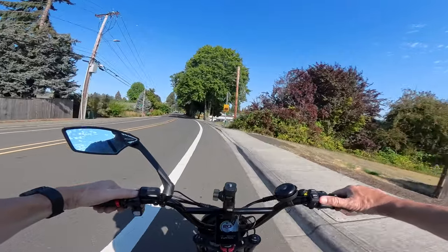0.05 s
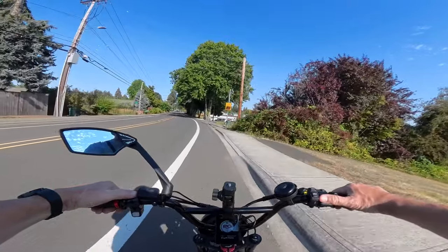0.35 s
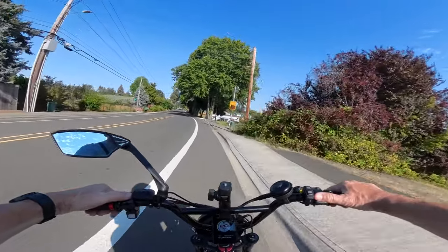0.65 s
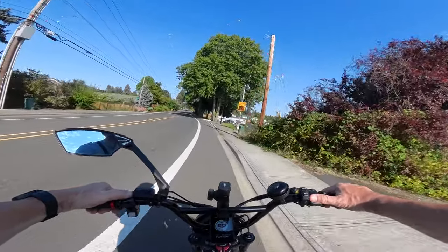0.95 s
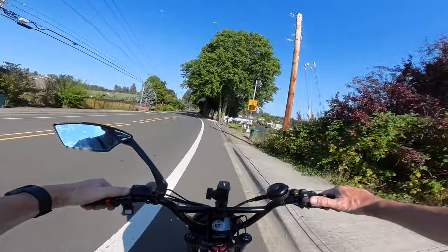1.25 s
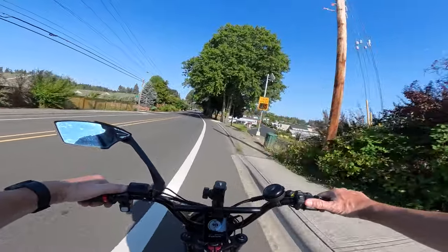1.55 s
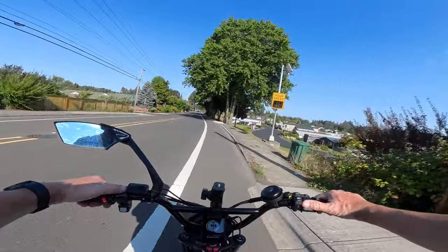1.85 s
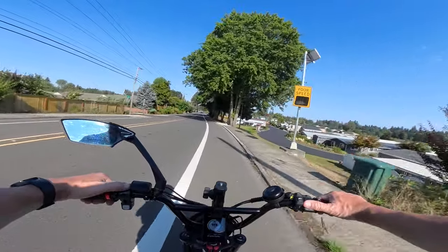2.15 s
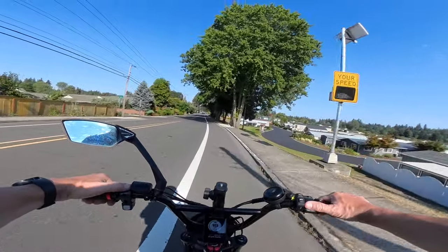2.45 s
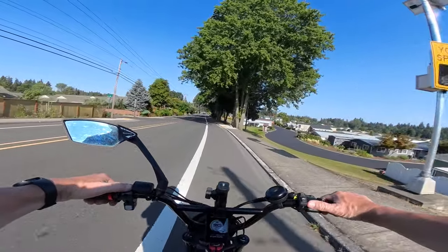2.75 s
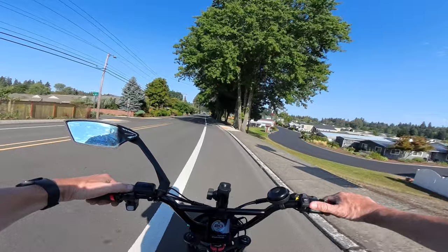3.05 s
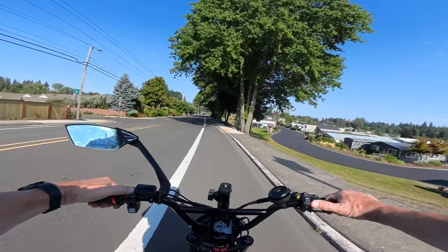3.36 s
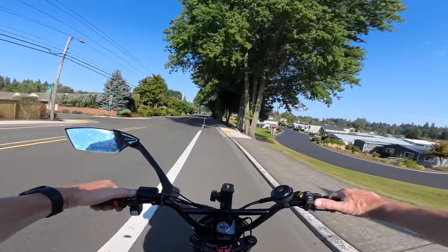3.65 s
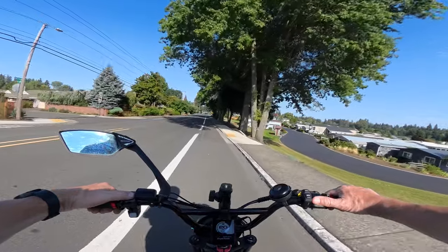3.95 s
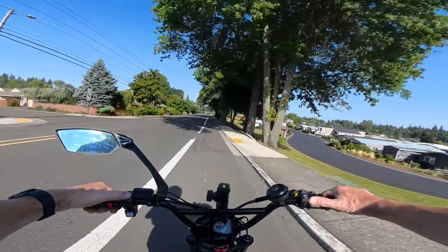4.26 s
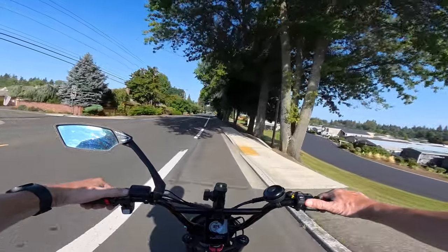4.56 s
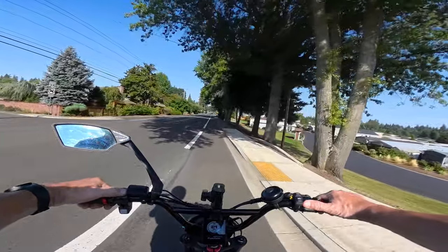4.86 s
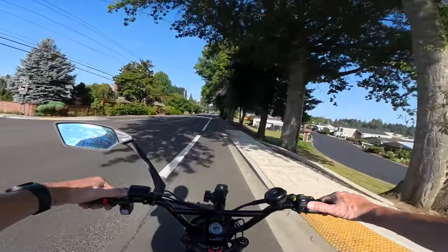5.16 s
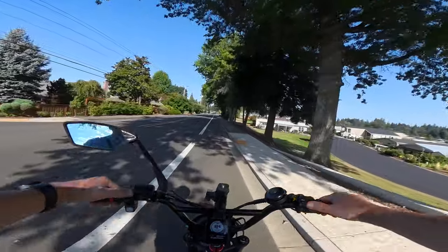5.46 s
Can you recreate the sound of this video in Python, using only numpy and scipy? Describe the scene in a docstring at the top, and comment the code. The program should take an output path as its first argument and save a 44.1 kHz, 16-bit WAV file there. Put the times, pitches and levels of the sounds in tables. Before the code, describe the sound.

Wind rumbles and thumps over the hum of an electric bike's motor, its tyres singing on asphalt with a faint brake rub.

```python
"""On a street, an electric bicycle coasts, then gathers speed, heard from the rider's chest.
The hub motor hums with the throttle, and its harmonics swell as they climb through frame resonances.
The tyres sing on the asphalt, and a slotted brake disc brushes its pads on every turn.
Turbulent air rumbles, gusts and buffets at the microphone.
Near the end the motor fades back and worn asphalt crunches and ticks."""
import sys
import numpy as np
from scipy import signal
from scipy.fft import rfft, irfft
from scipy.io import wavfile
from scipy.ndimage import uniform_filter1d

SR = 44100
rng = np.random.default_rng(int(sys.argv[2]) if len(sys.argv) > 2 else 0)


def digitize_waveform(pressure):
    """Quantize a signal to 16-bit integers and store it at the path in sys.argv[1].

    Rows of a 2-D input are taken as channels; values are limited to [-1, 1].
    """
    field = np.atleast_2d(pressure).T
    bounded = np.clip(field, -1, 1)
    quanta = np.round(bounded * 32767).astype(np.int16)
    wavfile.write(sys.argv[1], SR, quanta)


N = 251370
TIME = np.arange(N) / SR
FREQ = np.arange(N // 2 + 1) * SR / N

# Motor pitch, proportional to road speed. Each row: time in seconds, fundamental in Hz.
HUM_PITCH = [(0, 245.3), (1.6, 239), (2.1, 244.6), (3.5, 254.4), (4.5, 262.7), (5, 266.3), (5.7, 267.5)]
# Throttle. Each row: time in seconds, level of the fundamental in dB.
HUM_LEVEL = [(0, -45.5), (.5, -47), (.9, -56), (1.6, -50.5), (1.9, -54), (2.03, -41.5), (2.7, -41.3),
             (3.25, -38), (4.05, -43), (4.92, -40.3), (5.17, -50), (5.7, -50)]
# Motor harmonics. Each row: multiple of the fundamental, relative level in dB, flutter in dB.
HUM_HARMONICS = [(1, 0, 1.3), (2, -8.3, .4), (3, -2.6, 1.8), (4, -13, 1.5), (5, -12, 1.5)]
# Frame resonances. Each row: frequency in Hz, width in Hz, boost in dB.
FRAME_MODES = [(498, 3.5, 11), (505.5, 8, 10.5), (514, 9, 19.3), (521, 3.5, 15), (735, 7, 4.5),
               (743, 5, 2.5), (753, 8, 4), (766, 9, 4), (785, 10, 9), (795, 8, 8.5)]
# Bands of the tread. Each row: frequency at mean speed in Hz, width in Hz, relative level in dB,
# exponent of speed (1 follows the speed, 0 stays on a tyre resonance).
TYRE_BANDS = [(258.1, 24, -7.5, 1), (413.9, 69, -5.5, 0.012), (517, 22, -2.5, 0.03), (545.8, 45, -1.5, .6),
              (791, 52, -6, .3), (812.7, 67, -0.5, 0.0048), (1011, 67, -11.5, 0.3), (1250, 48, -8.5, 0.4)]
# Brief tyre tones. Each row: centre in seconds, length in seconds, pitch in Hz, level in dB.
TYRE_DRONES = [(.38, .14, 820, -43), (1.55, .1, 517, -38), (1.84, .12, 565, -41), (1.88, .1, 790, -39),
               (2.25, .08, 515, -39), (2.75, .12, 518, -39), (4.58, .12, 538, -39), (5.26, .08, 515, -37),
               (5.4, .12, 786, -37.5), (5.62, .14, 829, -36.5), (5.62, .2, 268, -41), (5.68, .1, 535, -35)]
# Rolling effort. Each row: time in seconds, relative level in dB.
ROLLING_EFFORT = [(0, -2.5), (.8, -1), (1.3, -2.5), (2, -0.5), (3.2, 0.47), (4.2, 0.8), (4.8, 0.6),
                  (5.4, 1.8), (5.7, 1.5)]
# Rolling noise. Each row: frequency in Hz, relative spectral level in dB.
ROAR_SPECTRUM = [(90, 3), (180, -3), (300, 0), (450, 0.5), (670, -2), (950, -0.5), (1300, -2), (1550, -8),
                 (2000, -14.3), (2800, -22.5), (5000, -36), (9000, -37.5), (16000, -43.5)]
# Wind noise. Each row: frequency in Hz, relative spectral level in dB.
WIND_SPECTRUM = [(8, 8), (20, 5), (42, 2.5), (65, -3.5), (100, -13), (160, -20.5), (300, -30.5), (700, -59),
                 (3000, -95)]
# Gusts. Each row: peak time in seconds, rise over the steady wind in dB, release in seconds.
WIND_GUSTS = [(.13, 3, 0.034), (.46, 3, .04), (.56, 4, .04), (.63, 9, 0.04), (.74, 3, 0.04),
              (.95, 7.5, .08), (1.14, 9.5, 0.055), (1.69, 6, 0.098), (2.44, 4, 0.032), (2.84, 6, 0.021),
              (3.21, 3, .06), (3.62, 4, .04), (3.72, 6, 0.028), (3.97, 6, .04), (4.11, 8, 0.12),
              (4.26, 4, 0.065), (4.38, 4, .04), (4.65, 7, 0.065), (4.82, 6, 0.045), (5.55, 5.5, 0.052)]
# Eddies that hit the microphone. Each row: centre in seconds, level in dB, pitch in Hz.
EDDIES = [(0.467, -18, 215), (0.544, -18, 81), (.554, -12.5, 318), (0.641, -16.5, 252), (.661, -16.5, 234),
          (1.121, -18, 97), (1.268, -26, 140), (1.324, -22, 138), (1.502, -23.5, 160), (1.706, -19, 150),
          (2.017, -15.5, 195), (2.288, -23.5, 176), (2.445, -21, 70), (3.491, -20, 168), (4.112, -11, 72),
          (4.139, -20, 180), (4.66, -22, 85), (4.82, -22, 89.5), (4.862, -17, 205), (5.565, -16.5, 101),
          (5.585, -20, 210)]
# Pad friction. Each row: frequency in Hz, relative spectral level in dB.
FRICTION_SPECTRUM = [(1500, 0.5), (2800, -16), (3200, 0), (4400, -1.5), (5400, -2), (6200, -6.5),
                     (7000, -6), (7450, 2), (8600, -4), (9500, -11.5), (12500, -14), (15700, -31)]
# Disc resonances. Each row: frequency in Hz, width in Hz, left gain in dB, right gain in dB,
# share from 0 to 1 that the warp swells.
DISC_MODES = [(3200, 100, 3.5, 4.5, 0), (3743, 200, 8, 3, 0.91), (4480, 150, 4, 4.5, 0),
              (4950, 85, 4, 6, 0.8), (5240, 66, 1, 4, 0.7), (5360, 76, 6, 9, 0.6), (5775, 290, 11.5, 3, 1),
              (6300, 60, 4, 1, .6), (8100, 55, 5, 0, 0), (8820, 710, 5.5, -0.5, 0.45),
              (12700, 300, -4, 3, 0.2), (14500, 2200, 6, 12.5, 0.2)]
# Pressure of the warped disc on the pads. Each row: fraction of a turn, relative level in dB.
DISC_WARP = [(0, -6.5), (.14, -3), (.24, -3.5), (.46, 3), (.53, 1), (.7, 4), (.79, 1.8), (.93, -6.5)]
# Pad contact. Each row: time in seconds, level of the disc's ringing in dB.
RING_LEVEL = [(0, -57), (1.3, -57.5), (2.3, -54.5), (4.7, -53), (5.7, -56.5)]
# A pad catches the disc. Each row: centre in seconds, length in seconds, level in dB.
PAD_CATCHES = [(1.585, .05, -57), (1.772, .06, -55), (2.15, .04, -58), (3.52, .04, -57)]
# Worn asphalt. Each row: frequency in Hz, relative spectral level in dB.
CRUNCH_SPECTRUM = [(1200, -20), (2500, 0), (2900, -12), (3150, 1), (3550, -2), (4200, -11), (8000, -22),
                   (15000, -35)]
# Grit hitting the frame. Each row: start in seconds, level in dB.
GRIT_HITS = [(5.2015, -40.5), (5.2912, -40)]
# Tick of the grit. Each row: frequency in Hz, relative spectral level in dB.
GRIT_SPECTRUM = [(1500, -8), (3000, 2), (6000, 3), (9000, 0), (15000, -5), (17000, -20)]
# Two microphone ports. Each row: frequency in Hz, side minus mid in dB, left phase lead in radians.
MIC_PORTS = [(60, -65, 0), (200, -58, 0), (380, -24, 0), (700, -14, 0), (1300, -9.5, 0.36), (2125, -4, 2.5),
             (2590, -1, 6.5), (4400, -2, 5.5), (8000, -2.5, 6.5), (15000, 0.5, 6.5)]


def hub_motor(hum_hz, wobble_rad=0.06, wobble_rad_per_db=0.07):
    """Forced vibration: the motor's harmonics follow the throttle and swell at frame resonances."""
    throttle_db = curve(HUM_LEVEL)
    cycles = np.cumsum(hum_hz) / SR
    hum = 0
    for multiple, db, flutter_db in HUM_HARMONICS:
        boost = 1 + sum((undb(boost_db) - 1) * resonance(multiple * hum_hz, hz, width)
                        for hz, width, boost_db in FRAME_MODES)
        gain = boost * undb(throttle_db + db + flutter_db * walk(16))
        waver = (wobble_rad + wobble_rad_per_db * flutter_db) * walk(26)
        hum += np.sqrt(2) * gain * np.sin(2 * np.pi * multiple * cycles + waver)
    return hum


def tyre_tread(speed, level_db, swell_from_s=4.7, swell_db_per_s=5):
    """Impact excitation: unevenly spaced tread blocks slap the road and ring the tyre in narrow bands."""
    song = 0
    for hz, width_hz, db, exponent in TYRE_BANDS:
        spread = 1 / (1 + (FREQ / (0.59 * width_hz)) ** 3)
        phase = 2 * np.pi * np.cumsum(hz * speed ** exponent) / SR
        song += undb(db) * (noise(spread) * np.cos(phase) + noise(spread) * np.sin(phase))
    swell_db = swell_db_per_s * np.maximum(TIME - swell_from_s, 0)
    return unit(song) * undb(level_db + swell_db)


def tyre_drones(waver_rad=0.32):
    """Forced vibration: a patch of asphalt makes the tyre sing one pitch for a moment."""
    tones = 0
    for s, length_s, hz, db in TYRE_DRONES:
        phase = 2 * np.pi * hz * TIME + waver_rad * walk(25)
        tones += undb(db) * swell(s, length_s) * np.sin(phase)
    return np.sqrt(2) * tones


def road_roar(db, grain_db=0.95):
    """Roughness excitation: rubber rolling on coarse asphalt radiates broadband noise."""
    return wide_noise(colour(ROAR_SPECTRUM)) * undb(db + grain_db * walk(22))


def wind_level(speed, steady_db=-27, exponent=2.6, attack_s=0.025, unrest_db=1.5):
    """A power law of speed sets the head wind's level in dB; gusts rise and decay exponentially."""
    gusts = sum((undb(db) - 1) * np.exp(-np.maximum((s - TIME) / attack_s, (TIME - s) / release_s))
                for s, db, release_s in WIND_GUSTS)
    return steady_db + 20 * np.log10(speed ** exponent * (1 + gusts)) + unrest_db * walk(17)


def wind_rumble(db, turbulence_db=3.3, steadiness=0.98, flurry_follow=0.7, flurry_db=-1):
    """Turbulence at the microphone: large eddies rumble with the gusts, small ones come in flurries."""
    rumble = noise(colour(WIND_SPECTRUM))
    # the largest eddies keep a fairly even strength between gusts
    power = uniform_filter1d(uniform_filter1d(rumble ** 2, size=SR // 14), size=SR // 20)
    rumble = unit(rumble / power ** (steadiness / 2))
    large = irfft(rfft(rumble) / (1 + (FREQ / 75) ** 4), N)
    small_db = db.mean() + flurry_follow * (db - db.mean()) + turbulence_db * walk(10.4) + flurry_db
    return large * undb(db) + (rumble - large) * undb(small_db)


def wind_buffets(width_cycles=0.41, push_db=-4, push_s=0.0044):
    """Pressure transients: each eddy gives the microphone a slow push and a flap of a cycle or two."""
    pressure = np.zeros(N)
    for s, db, hz in EDDIES:
        phase, polarity = rng.uniform(-np.pi, np.pi, 2)
        near = np.abs(TIME - s) < .06
        t = TIME[near] - s
        flap = np.exp(-(t * hz / width_cycles) ** 2 / 2) * np.cos(2 * np.pi * hz * t + phase)
        push = np.sign(polarity) * t / push_s * np.exp(-(t / push_s) ** 2 / 2)
        pressure[near] += undb(db) * (flap + undb(push_db) * push)
    return pressure


def slot_friction(turns, slots_per_turn=15, rise=0.11, decay=0.37, drag=0.26, scatter_db=1.04):
    """Sliding friction: noise pulses as each slot of the disc passes the pads, over a steady drag."""
    slots = turns * slots_per_turn + 0.295
    force = undb(scatter_db * rng.standard_normal(1024))[slots.astype(int) % 1024]
    since_edge = slots % 1  # in slot spacings, as are rise and decay
    scrapes = force * np.exp(-since_edge / decay) + np.exp((since_edge - 1) / rise) + drag
    return wide_noise(np.ones(len(FREQ))) * scrapes * undb(0.9 * walk(900) + 0.9 * walk(23))


def brake_disc(turns, ring_db, hiss_db, play_turns=0.042, flicker_db=1.3):
    """Modal resonance: friction rings the disc, and its warp modulates the ringing once a turn."""
    friction = slot_friction(turns)
    modes_db, shares = 0, []
    for hz, width, left_db, right_db, share in DISC_MODES:
        modes_db += np.array([[left_db], [right_db]]) * resonance(FREQ, hz, width)
        shares.append(share * resonance(FREQ, hz, 1.26 * width))
    total = sum(shares)
    rub = rfft(friction) * colour(FRICTION_SPECTRUM) * undb(modes_db)
    pressure = undb(np.interp(turns + play_turns * walk(8.1), *np.transpose(DISC_WARP), period=1))
    # the pads shift, so each mode speaks with its own changing strength
    rings = sum(irfft(rub * share / np.maximum(total, 1), N) * undb(flicker_db * walk(30))
                for share in shares)
    hiss = irfft(rub * np.maximum(1 - total, 0), N)
    return unit(pressure * rings) * undb(ring_db) + unit(hiss) * undb(hiss_db)


def pad_chafes(hz=3190, width_hz=300, drag=0.26):
    """Frictional excitation: a pad catches the disc and rasps on its lowest mode."""
    band = wide_noise(resonance(FREQ, hz, width_hz))
    catches = sum(undb(db) * swell(s, length_s) for s, length_s, db in PAD_CATCHES)
    return band * (drag + np.abs(walk(90))) * catches


def asphalt_crunch(start_s=4.95, rise_s=.15, db=-54.5, grain_db=3.5):
    """Random impacts: loose grains on worn asphalt crackle under the tyres as fluctuating noise."""
    grains = unit(wide_noise(colour(CRUNCH_SPECTRUM)) * undb(grain_db * walk(160)))
    return grains * undb(db) * np.clip((TIME - start_s) / rise_s, 0, 1)


def grit_ticks(tick_s=.003, rattle_s=.011, rattle_db=-13):
    """Damped impacts: grit flicked against the frame gives a bright tick and a short rattle."""
    blows = sum(undb(db) * (strike(s, tick_s) + undb(rattle_db) * strike(s, rattle_s))
                for s, db in GRIT_HITS)
    return blows * wide_noise(colour(GRIT_SPECTRUM))


def undb(db):
    """Amplitude ratio of a level in decibels."""
    return 10 ** (np.asarray(db) / 20)


def unit(x):
    """Normalisation to rms 1."""
    return x / np.sqrt(np.mean(x ** 2))


def curve(points):
    """Linear interpolation of (seconds, value) points at every sample."""
    return np.interp(TIME, *np.transpose(points))


def colour(points):
    """Spectral gain from (Hz, dB) points, interpolated in log frequency."""
    hz, db = np.transpose(points)
    return undb(np.interp(np.log(FREQ + 1e-3), np.log(hz), db))


def resonance(hz, centre_hz, width_hz):
    """Lorentzian peak of height 1, with the given full width at half height."""
    return 1 / (1 + (2 * (hz - centre_hz) / width_hz) ** 2)


def noise(gain):
    """Gaussian noise of rms 1, shaped by a spectral gain."""
    return unit(irfft(rfft(rng.standard_normal(N)) * gain, N))


def wide_noise(gain):
    """Partial coherence: noise at two close ports is alike in the bass, less so in the treble."""
    hz, side_db, lead = np.transpose(MIC_PORTS)
    side_share = colour(np.column_stack([hz, side_db]))
    shift = np.exp(1j * np.interp(FREQ, hz, lead))
    mid, side = rfft(rng.standard_normal((2, N))) * gain / np.hypot(1, side_share)
    left, right = (mid + side * side_share) * shift, mid - side * side_share
    return unit(irfft(np.array([left, right]), N))


def walk(rate_hz):
    """Smooth random fluctuation of rms 1, low-passed at the given rate."""
    return noise(1 / (1 + (FREQ / rate_hz) ** 4))


def strike(s, decay_s):
    """Exponential decay from a sudden onset."""
    return (TIME >= s) * np.exp(-np.abs(TIME - s) / decay_s)


def swell(s, length_s):
    """Gaussian rise and fall around a moment."""
    return np.exp(-2 * ((TIME - s) / length_s) ** 2)


def scene(hum_cycles_per_turn=48.3):
    """Superposition: one road speed drives motor, tread, disc and wind, and their pressures add."""
    hum_hz = curve(HUM_PITCH)
    speed = hum_hz / hum_hz.mean()
    turns = np.cumsum(hum_hz) / SR / hum_cycles_per_turn
    effort_db = curve(ROLLING_EFFORT)
    scrape_db = 2 * np.exp(-((TIME - 0.55) / 0.35) ** 2)  # the pads scrape harder for a moment
    hiss_db = -51.5 + 0.24 * effort_db + scrape_db
    centre = hub_motor(hum_hz) + tyre_drones() + wind_rumble(wind_level(speed)) + wind_buffets()
    tyres = tyre_tread(speed, -34 + 1.07 * effort_db) + road_roar(-31.5 + 1.04 * effort_db)
    brake = brake_disc(turns, curve(RING_LEVEL), hiss_db) + pad_chafes()
    return centre + tyres + brake + asphalt_crunch() + grit_ticks()


def record(dry):
    """Band limiting: an elliptic low-pass filter cuts the top of the treble steeply."""
    return signal.sosfilt(signal.ellip(12, .2, 80, 15750, fs=SR, output="sos"), dry)


dry = scene()
out = record(dry)
digitize_waveform(out)
```